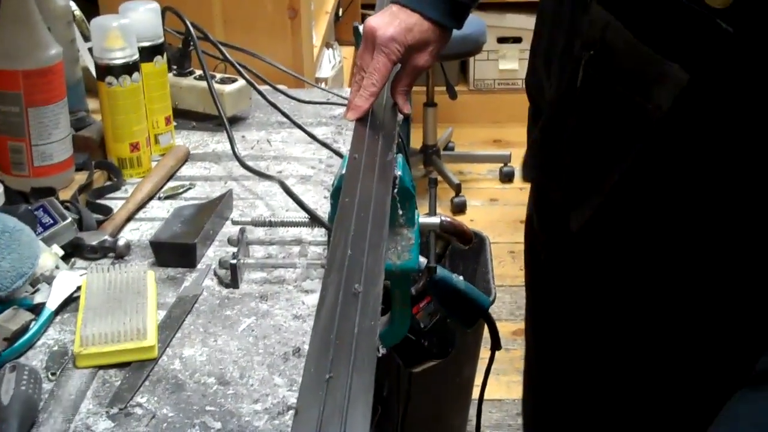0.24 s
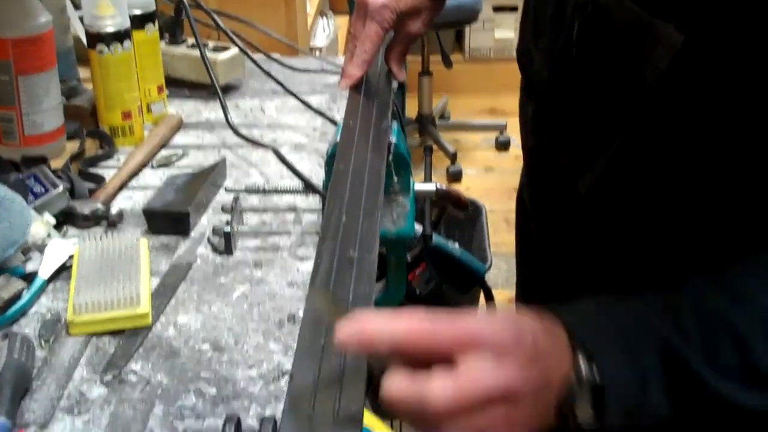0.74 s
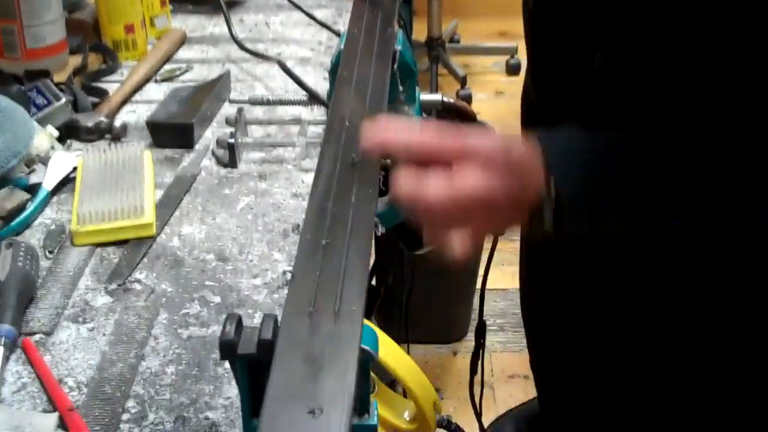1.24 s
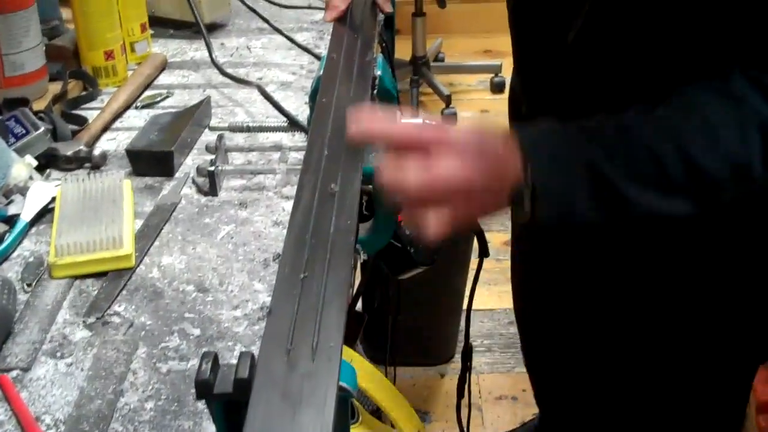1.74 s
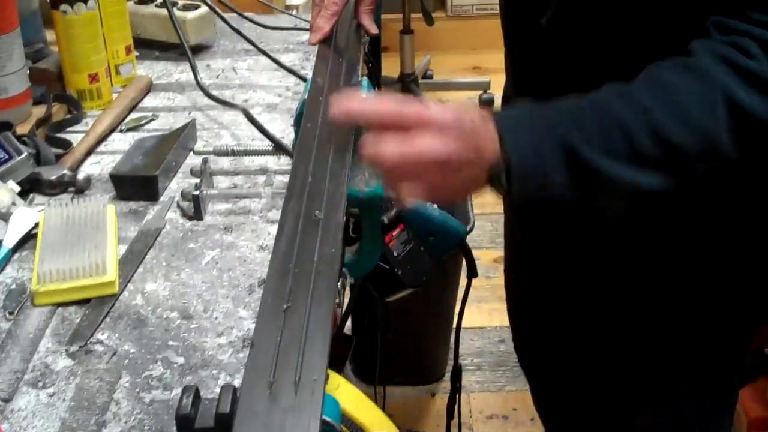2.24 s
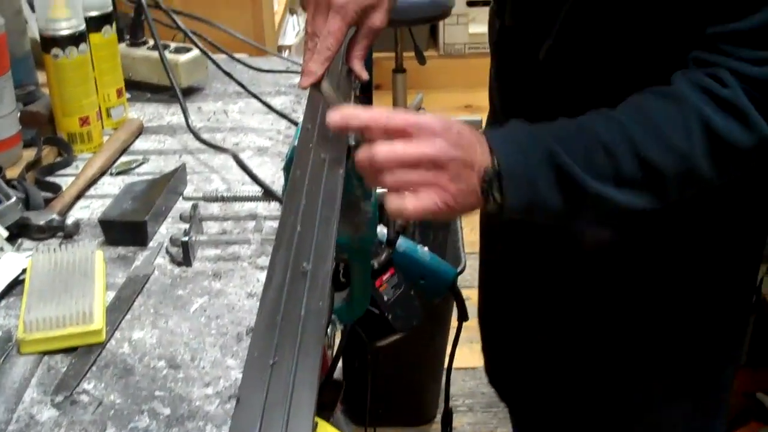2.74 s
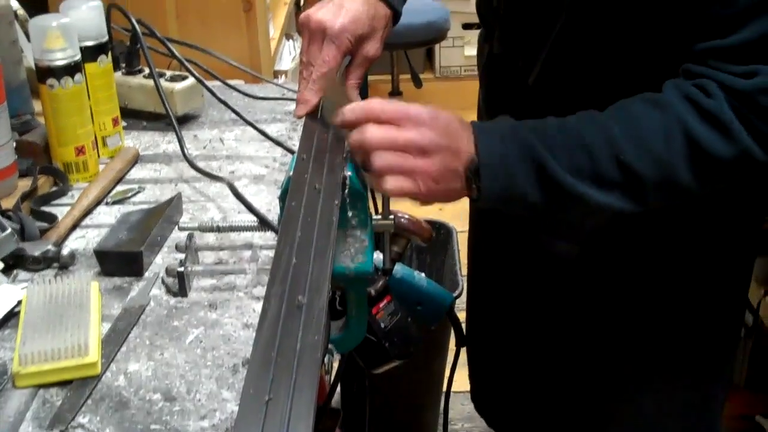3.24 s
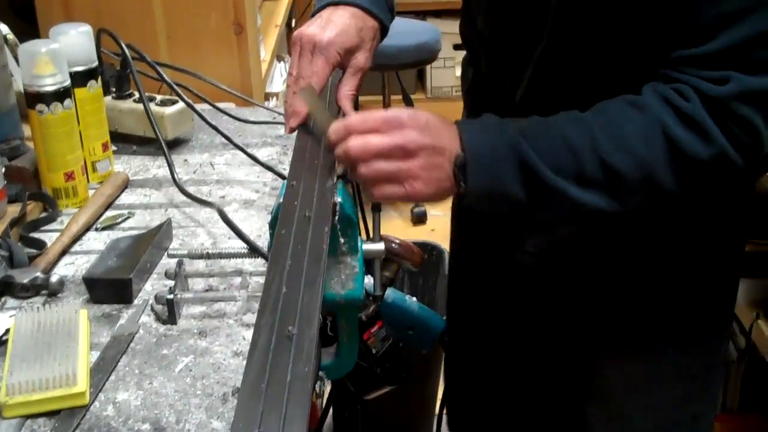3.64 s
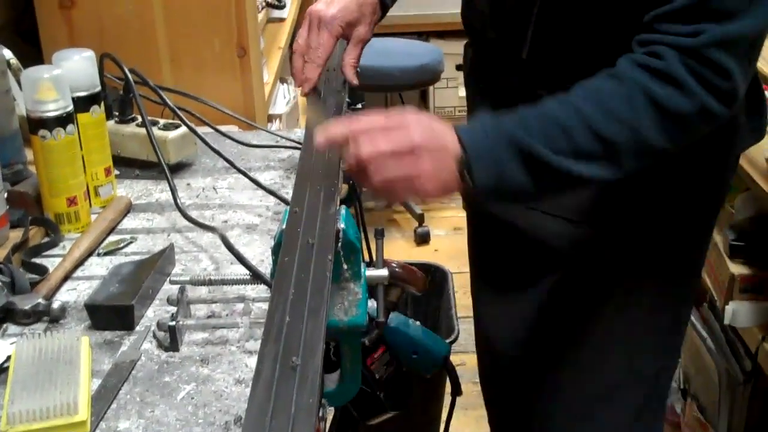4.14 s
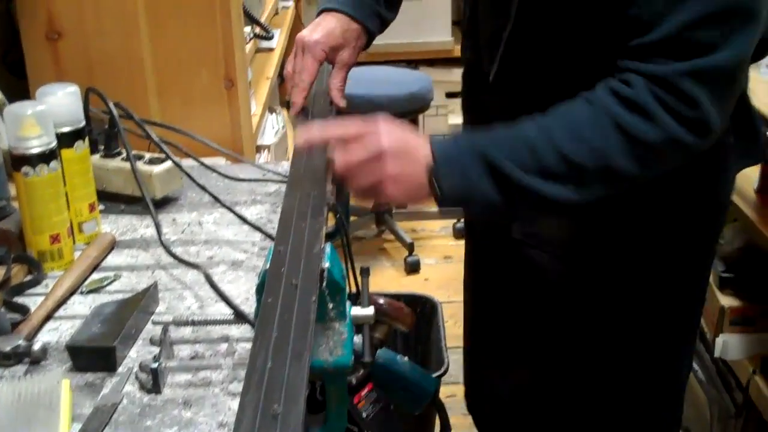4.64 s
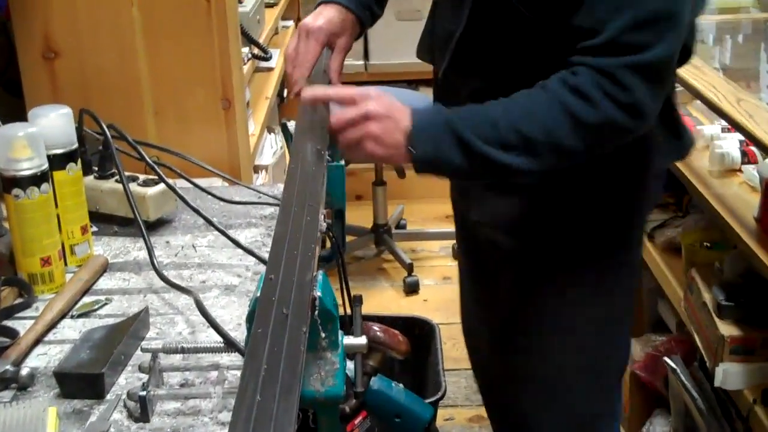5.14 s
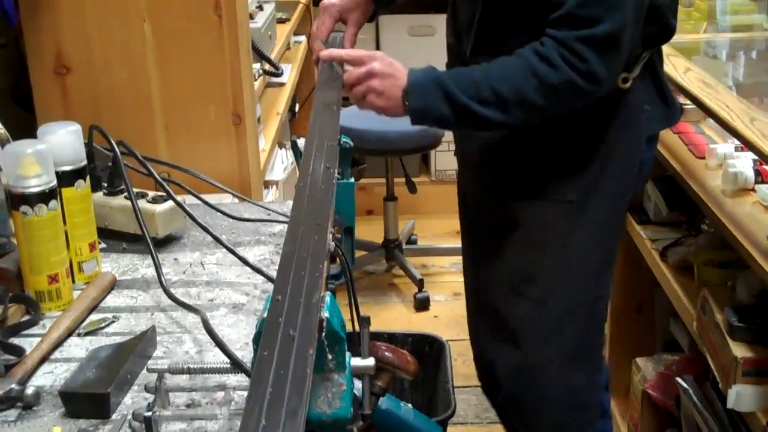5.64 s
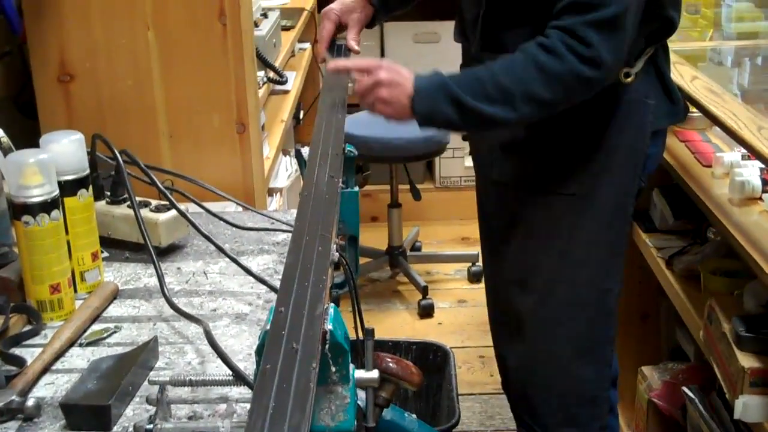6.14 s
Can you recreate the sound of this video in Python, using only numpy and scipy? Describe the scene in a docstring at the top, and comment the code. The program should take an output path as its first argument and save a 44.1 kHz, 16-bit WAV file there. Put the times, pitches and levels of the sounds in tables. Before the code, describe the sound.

A scraper works wax off the edge of a clamped ski in a small cluttered workshop, heard close in stereo. From 0 s, short scrapes quickly build into strong bright hissing strokes, each about a fifth of a second, swelling and stopping abruptly; the fullest comes near 0.6 s, with a thin squeak and flakes ticking at 0.7 s. After a weak touch at 0.8 s, broad sizzling strokes continue to 2.4 s, with snaps near 1.0 and 1.25 s. From 2.5 to 3.8 s the scrapes are shorter and choppier, raspier, with dull low bumps, a faint high squeal around 3.05 s and a hard knock at 3.34 s followed by small ticks. From 3.9 s to the end near 6.4 s, softer alternating strokes return, more hollow and ringing, with light knocks around 4.5, 5.0 and 5.6 s. Tiny wavering squeaks close it. Reflections are short; quiet room air lies beneath.

```python
"""Wax shears off in a grainy hiss, stroke after stroke, as a scraper goes to and fro along a ski's edge.
Breaking-wax noise makes the hiss, the blade's rasp and the ringing of the ski's body.
Sine modes thud dully as the ski bumps in its vice; noise bursts tick as flakes snap and knock as the
blade catches, and brief wavering tones squeak. A workshop reverberates around a camera's two ports."""
import sys
import numpy as np
from scipy import signal
from scipy.fft import rfft, irfft
from scipy.io import wavfile
from scipy.ndimage import uniform_filter1d, minimum_filter1d

SR = 44100
rng = np.random.default_rng(int(sys.argv[2]) if len(sys.argv) > 2 else 0)


def dump_mix(stems):
    """Bounce the given channels to the path in sys.argv[1] as a 16-bit WAV at rate SR."""
    frames = np.atleast_2d(stems).T  # one column per channel
    limited = np.clip(frames, -1, 1)  # hard clip at full scale
    pcm = np.round(limited * 32767).astype(np.int16)
    wavfile.write(sys.argv[1], SR, pcm)


N = 282240
TIME = np.arange(N) / SR
FREQS = np.fft.rfftfreq(N, 1 / SR)


def from_db(db):
    """Decibels to gain."""
    return 10 ** (np.asarray(db) / 20)


def evened(x):
    """Scales to rms 1."""
    return x / np.sqrt(np.mean(x ** 2) + 1e-20)


def read(points, hz):
    """Reads a table on a log-frequency axis."""
    f, value = np.transpose(points)
    return np.interp(np.log(hz + 1), np.log(f + 1), value)


def wobble(rate_hz):
    """Slow random drift of rms 1, made of noise below about the given rate."""
    spectrum = rfft(rng.standard_normal(N))
    return evened(irfft(spectrum / (1 + (FREQS / rate_hz) ** 4), N))


# air resonance of each microphone port: (frequency [Hz], level [dB])
LEFT_PORT_RESPONSE = [(100, -6), (3000, 1), (5300, 5.5), (6300, 7.5), (7000, 9.5), (7650, 13), (8300, 10),
                      (9200, 4), (10000, -1), (12000, -10.5), (14000, -3)]
RIGHT_PORT_RESPONSE = [(100, -7.5), (3000, -0.5), (5300, 3.5), (5900, 6.5), (6350, 12.5), (6750, 4),
                       (7200, 1), (8000, -4.5), (10000, -15), (12000, -29), (14000, -32)]
# how alike the two ports hear: (frequency [Hz], likeness [0-1])
PORT_LIKENESS = [(50, 0), (200, 0.2), (800, 0.95), (3000, 0.97), (4500, 0.73), (5500, 0.5), (6500, 0.16),
                 (7500, 0.14), (14000, 0.4)]


def at_ports(pair, spectrum, ring=1):
    """Colours two unrelated excitations into what the two resonant ports hear; their mean has rms 1."""
    shared, apart = rfft(pair)
    same = read(PORT_LIKENESS, FREQS)
    left = shared * from_db(read(LEFT_PORT_RESPONSE, FREQS))
    right = same * shared + np.sqrt(1 - same ** 2) * apart
    right = right * from_db(read(RIGHT_PORT_RESPONSE, FREQS))
    coloured = np.array([left, right]) * from_db(read(spectrum, FREQS)) * ring
    heard = irfft(coloured, N)
    return heard / np.std(heard.mean(0))


# spectrum of the room's still air: (frequency [Hz], level [dB])
AIR_SPECTRUM = [(20, 6.5), (50, -1), (100, -3.5), (300, -2), (1000, -5), (4000, -18), (14000, -41)]


def room_air():
    """The still air of the room: steady, low-weighted noise."""
    return from_db(-63.5) * at_ports(rng.standard_normal((2, N)), AIR_SPECTRUM)


RASP_SWELL, BODY_SWELL = 0.26, 0.017  # share of the hiss's swell that the rasp and the body follow
GRIND_S = 0.073  # the slowing blade digs in over about this long
DIG_DB, DIG_S = 3, 0.032  # the blade rasps harder as it first digs in
# as the blade lifts, hiss and rasp stop quickly while the ski rings down
LIFT_DB_PER_S, RING_DOWN_DB_PER_S = 708, 321


def stroke(start, length, bite_s, crest, swell_db, hiss_db, rasp_db, body_db, lean_db, grind_db):
    """Gains of hiss, rasp and body: the hiss follows the hand's speed; rasp and body shift as it slows."""
    age = TIME[(TIME >= start) & (TIME < start + length + .2)] - start
    crest = np.clip(crest, .05, .95)
    travel = np.interp(age, [0, crest * length, length], [0, .5, 1])
    speed = abs(np.sin(np.pi * travel))
    sag_db = swell_db * (speed - 1)
    lifted = np.maximum(age - length, 0)
    finish = np.exp(np.minimum(age - length, 0) / GRIND_S)
    dig_db = DIG_DB * np.exp(-age / DIG_S)
    levels = [hiss_db + sag_db - LIFT_DB_PER_S * lifted,
              rasp_db + dig_db + RASP_SWELL * sag_db + lean_db * finish - LIFT_DB_PER_S * lifted,
              body_db + BODY_SWELL * sag_db + grind_db * finish - RING_DOWN_DB_PER_S * lifted]
    return np.minimum(age / bite_s, 1) * from_db(levels)


RESTING_DB = (-51.5, -52.5, -57)  # the blade brushes the ski between strokes: (hiss, rasp, body)
# pushes and pulls of the scraper: (start [s], length [s], bite [s], place of top speed [0-1, kept to .05-.95],
# swell of the hiss [dB], wax hiss level [dB], blade rasp level [dB], ski body level [dB],
# change of the rasp at the finish [dB], change of the body at the finish [dB])
SCRAPER_STROKES = [(0.001, 0.053, 0.0013, 0.8, 15.0, -28, -37.5, -48, 0.0, 5),
                   (0.062, 0.16, 0.027, 0.92, 8.5, -22, -31, -43, 3.5, 4.5),
                   (0.255, 0.2, 0.033, 0.35, 9.0, -17.0, -27.5, -44.5, 1, 9.5),
                   (0.536, 0.24, 0.067, 0.82, 20.5, -12.5, -26, -41.5, -0.5, 1.5),
                   (0.791, 0.065, 0.028, 0.42, 8, -47.5, -40, -43, -1.5, 0),
                   (0.899, 0.15, 0.02, 0.98, 15.5, -17.5, -27.5, -45, 4, 4),
                   (1.095, 0.28, 0.029, 0.29, 1.5, -18.0, -26, -40, 3, 2),
                   (1.418, 0.22, 0.034, 0.64, 11.5, -17.5, -29.5, -46.5, 3, 7.5),
                   (1.663, 0.25, 0.031, 0.49, 14.5, -14.5, -26, -46, 1.5, 7),
                   (1.977, 0.18, 0.037, 0.52, 5, -21.5, -34.5, -43.5, 9, 3.5),
                   (2.192, 0.2, 0.035, 0.55, 8.5, -17, -23.5, -40.5, -5.5, -2.5),
                   (2.481, 0.039, 0.013, 0.38, 10, -36.5, -41.5, -56, -0.5, -2),
                   (2.518, 0.094, 0.027, 0.89, 7.0, -23.5, -37.5, -50, 6, 4),
                   (2.645, 0.15, 0.029, 0.44, 17, -19.5, -22.5, -44, -8, 3),
                   (2.849, 0.1, 0.024, 0.74, 12, -24, -33.0, -51, -2, 3),
                   (2.985, 0.1, 0.024, 0.65, 12, -18.5, -24.5, -42.5, -6, -1),
                   (3.162, 0.082, 0.012, 0.24, 4, -34.5, -39, -49, 1.5, 1.5),
                   (3.288, 0.07, 0.011, 0.86, 10, -23, -31.0, -45, -1.5, 2.5),
                   (3.449, 0.011, 0.01, 0.52, 4, -33, -36.5, -41, 3, -1),
                   (3.483, 0.043, 0.004, 0.3, 4, -30, -31, -43, -2.5, -3),
                   (3.561, 0.12, 0.018, 0.3, 5, -28.5, -27, -40, -5, -2),
                   (3.728, 0.11, 0.021, 0.89, 10.5, -27, -31.5, -49.5, -2, -0.5),
                   (3.864, 0.2, 0.022, 0.68, 7.5, -22, -27.5, -41.5, -6.5, 3.5),
                   (4.14, 0.17, 0.02, 0.62, 8, -26, -36.5, -55, -0.5, 12),
                   (4.348, 0.221, 0.023, 0.46, 12.5, -20, -32, -44.5, 5, 4.5),
                   (4.628, 0.21, 0.015, 0.85, 8, -31.5, -40, -49.5, 4, -0.5),
                   (4.868, 0.18, 0.024, 0.48, 17, -21.5, -27.5, -48.5, -14, 8.5),
                   (5.018, 0.11, 0.02, 0, 12, -24, -31, -42.5, 2, 1.5),
                   (5.204, 0.2, 0.046, 0.82, 22.5, -29.5, -39, -47.5, 7, 3.5),
                   (5.422, 0.28, 0.06, 0.42, 3.5, -21.5, -30.5, -40, 8.5, 0),
                   (5.755, 0.23, 0.052, 0.92, 12.0, -31, -36.0, -48.5, 1.5, 3.5),
                   (6.027, 0.19, 0.023, 0.92, 11, -25.5, -30.5, -41, 0.5, -6),
                   (6.222, 0.17, 0.025, 0, 13.5, -27.5, -28.5, -42, 5, -1.5)]


def effort():
    """All strokes add in power over the light touch of the resting blade: gains of hiss, rasp and body."""
    power = np.outer(from_db(RESTING_DB) ** 2, np.ones(N))
    for row in SCRAPER_STROKES:
        gains = stroke(*row)
        first = np.searchsorted(TIME, row[0])
        power[:, first:first + gains.shape[1]] += gains ** 2
    return np.sqrt(power)


def fractures(per_s, spread_db, smooth):
    """Tiny breaks in the wax, uneven in size, over smooth sliding friction."""
    size = from_db(spread_db * np.minimum(rng.exponential(1, N), 6))
    breaks = size * (rng.random(N) < per_s / SR)
    grains = evened(breaks * rng.choice([-1., 1.], (2, N)))
    return grains + smooth * rng.standard_normal((2, N))


def wandering(pair, spread_db, span_hz, hold_s):
    """As the blade travels it favours ever other modes: narrow bands swell and fade."""
    hz, t, z = signal.stft(pair, SR, nperseg=1024, noverlap=768)
    lag = np.fft.fftfreq(len(hz), hz[1])[:, None]
    rate = np.fft.fftfreq(len(t), t[1])
    smooth = np.exp(-(lag * span_hz) ** 2 - (rate * hold_s) ** 2)
    chance = np.fft.fft2(rng.standard_normal(smooth.shape))
    field = evened(np.fft.ifft2(chance * smooth).real)
    gain = from_db(spread_db * np.clip(field, -2, 2))
    return signal.istft(z * gain, SR, nperseg=1024, noverlap=768)[1][:, :N]


# what the ski rings with: (frequency [Hz], width [Hz], level over the broad response [dB])
SKI_MODES = [(182, 8.3, 10), (314, 11, 9.5), (459.5, 20, 10.5), (666, 94, 8), (831, 33, 4.5),
             (993, 23, 6.5), (1250, 30, 6), (1541, 24, 7), (1700, 18, 8), (1860, 130, 3), (2260, 76, -7.5),
             (2490, 39, 3.5), (2662, 41, 5.5), (2812, 27, 6.5), (3035, 22, 6.5), (3100, 51, 4.5),
             (3300, 29, 5), (3504, 42, 4.5), (4570, 170, -0.5)]


def ski_response():
    """Resonances on top of the ski's broad response; a negative level makes a dip."""
    return 1 + sum((from_db(db) - 1) / (1 + 2j * (FREQS - hz) / width) for hz, width, db in SKI_MODES)


# how far the work has moved out towards the ski's end: (time [s], share [0-1])
OUTWARD_TRAVEL = [(0, 0.18), (2.4, 0.36), (4.2, 0.86), (4.8, 0.98), (6.4, 1)]
# wax hiss at the ski's middle and near its end: (frequency [Hz], level [dB])
HISS_MIDDLE_SPECTRUM = [(500, -69), (2000, -40), (3800, -13), (5400, -5), (6350, 4), (7600, 2), (9500, -4),
                        (12000, 3), (14000, -5.5)]
HISS_END_SPECTRUM = [(500, -50), (2000, -33), (3800, -21.5), (5200, 1), (6350, 0), (7600, 1), (9500, 1.5),
                     (12000, 5.5), (14000, 0)]
# rasp of the blade: (frequency [Hz], level [dB])
RASP_SPECTRUM = [(300, -38), (1000, -31), (2150, -4.5), (2650, 2), (3300, 1.5), (3800, -0.5), (4500, 3.5),
                 (5500, -2.5), (8000, -3), (14000, -43)]
# the ski's body at its middle and near its end: (frequency [Hz], level [dB])
BODY_MIDDLE_SPECTRUM = [(60, -44), (250, -29), (420, -9.5), (560, -15), (760, 1.5), (1000, -4.5), (1300, 4),
                        (1800, 3), (2200, 4), (2800, -10), (3800, -11), (6000, -38)]
BODY_END_SPECTRUM = [(60, -32), (250, -14.5), (550, -13), (760, -3), (1030, 6), (1300, 4), (1750, -4),
                     (2200, 8), (2800, 0.5), (3800, -24), (6000, -39)]


def scraping():
    """Breaking wax hisses, the blade rasps and the ski's body sounds beneath them."""
    hiss_gain, rasp_gain, body_gain = effort()
    outward = np.interp(TIME, *np.transpose(OUTWARD_TRAVEL))
    grip = wobble(rate_hz=24)  # the blade grips and slides unevenly
    judder = wobble(rate_hz=100)
    ring = ski_response()
    wax = fractures(per_s=2500, spread_db=2.0, smooth=1.0)
    wax = wandering(wax, spread_db=4.5, span_hz=363, hold_s=0.064)
    blade = fractures(per_s=3000, spread_db=2.0, smooth=0.65)
    blade = wandering(blade, spread_db=4.0, span_hz=208, hold_s=0.037)
    ski = fractures(per_s=1500, spread_db=0.5, smooth=0.82)
    ski = wandering(ski, spread_db=4.5, span_hz=121, hold_s=0.086)

    shear = (1 - outward) * at_ports(wax, HISS_MIDDLE_SPECTRUM) + outward * at_ports(wax, HISS_END_SPECTRUM)
    hiss = shear * hiss_gain * from_db(1.22 * grip + 0.13 * judder)
    rasp = at_ports(blade, RASP_SPECTRUM, ring) * rasp_gain * from_db(0.68 * grip + 0.37 * judder)
    # the free end rings more sharply than the clamped middle
    middle = at_ports(ski, BODY_MIDDLE_SPECTRUM, ring)
    end = at_ports(ski, BODY_END_SPECTRUM, ring * abs(ring) ** 0.38)
    body = (1 - outward) * middle + outward * end
    return hiss + rasp + body * body_gain * from_db(0.26 * wobble(rate_hz=78))


# workshop reverberation: (frequency [Hz], t60 [s])
ROOM_DECAY = [(150, 0.88), (800, 0.22), (2500, 0.2), (6000, 0.13), (14000, 0.13)]


def workshop(x):
    """A short, cluttered room: sparse reflections, the treble dying first."""
    taps = rng.choice([-1., 1.], (2, SR // 2)) * (rng.random((2, SR // 2)) < 2500 / SR)
    taps[:, :SR // 200] = 0  # no reflection in the first 5 ms
    hz, t, z = signal.stft(taps, SR, nperseg=256)
    same = 1 / (1 + (hz[:, None] / 450) ** 2)  # long waves reach both ports alike
    z[1] = same * z[0] + np.sqrt(1 - same ** 2) * z[1]
    decay = from_db(-60 * t / read(ROOM_DECAY, hz)[:, None])
    tail = signal.istft(z * decay, SR, nperseg=256)[1]
    return signal.fftconvolve(x, tail / np.linalg.norm(tail[0]), axes=1)[:, :N]


# the pushes bump the ski in the vice: (time [s], level before a common 9 dB cut [dB])
VICE_BUMPS = [(0.018, -44), (0.078, -45.5), (0.392, -53), (0.439, -48), (0.558, -46), (0.783, -49),
              (1.275, -45), (1.836, -43), (2.037, -49), (2.778, -45), (3.071, -37), (3.173, -44.5),
              (3.35, -38.5), (3.567, -38.5), (3.66, -39.5), (3.961, -38), (4.05, -42.5), (4.171, -48),
              (4.287, -45), (4.346, -45), (4.49, -43), (4.691, -45.5), (5.119, -42.5), (5.531, -42.5),
              (5.59, -44.5), (6.048, -42), (6.12, -45), (6.268, -53)]
# the clamped ski's bending modes: (frequency [Hz], level [dB], t60 [s])
BENDING_MODES = [(107, -9, 0.13), (147.5, -4.5, 0.079), (187.3, -3, 0.12), (240.4, -5, 0.16),
                 (312, -1.5, 0.067), (390, -5.5, 0.16), (471, -2.5, 0.076), (572, -3.5, 0.18)]


def bumps():
    """Each bump rings the bending modes, a little differently as the hand damps and loads the ski."""
    out, age = np.zeros(N), np.arange(SR // 3) / SR
    chance = rng.standard_normal((len(VICE_BUMPS), len(BENDING_MODES), 3))
    rise = 1 - np.exp(-age / 0.0014)
    for (s, db), draws in zip(VICE_BUMPS, chance):
        thud = np.zeros(len(age))
        for (hz, mode_db, t60), (size, load, turn) in zip(BENDING_MODES, draws):
            loudness = from_db(mode_db + 2.5 * size - 60 * age / t60)
            thud += loudness * np.sin(2 * np.pi * (hz * (1 + 0.043 * load) * age + turn))
        part = out[round(s * SR):][:len(age)]
        part += (from_db(db - 9) * thud * rise)[:len(part)]
    return out * from_db([[1], [-1]])  # slightly to the left


def blow(s, db, t60, rise_s):
    """Envelope of one blow: a quick rise, then a steady dying away."""
    age = np.maximum(TIME - s, 0)
    fall_db = np.minimum(60 * age / max(t60, .005), 200)
    return (1 - np.exp(-age / rise_s)) * from_db(db - fall_db)


# flakes of wax snap off: (time [s], level before a common 4.5 dB cut [dB], t60 [s])
WAX_SNAPS = [(0.1679, -5, 0.027), (0.7155, -4, 0.023), (0.7298, -5, 0.04), (1.011, -5.5, 0.068),
             (1.23, -1, 0.07), (1.329, -10, 0.066), (2.1344, -25, 0.03), (3.331, -16, 0.03),
             (3.3624, -11.5, 0.021), (3.4526, -28, 0.055), (3.484, -11.5, 0.024), (3.4955, -15, 0.05),
             (6.1376, -17, 0.032)]


def snaps():
    """A snapping flake only ticks: a short burst of noise with the colour of the wax."""
    ticks = sum(blow(s, db, t60, rise_s=0.00031) for s, db, t60 in WAX_SNAPS)
    return from_db(-4.5) * ticks * at_ports(rng.standard_normal((2, N)), HISS_MIDDLE_SPECTRUM)


# the blade sticks and slips: (middle [s], length [s], frequency [Hz], level [dB])
BLADE_SQUEAKS = [(0.677, .03, 7750, -13), (2.915, .06, 7600, -25), (3.048, .11, 7750, -19),
                 (6.252, .014, 2720, -26), (6.254, .02, 3530, -27), (6.307, .028, 3530, -26),
                 (6.318, .018, 2780, -27), (6.364, .03, 3600, -29), (6.383, .024, 2390, -30),
                 (6.393, .016, 4220, -29)]


def squeaks():
    """The blade's stick and slip as short unsteady sine tones, each heard through the two ports."""
    out, waver = np.zeros((2, N)), wobble(rate_hz=110)
    for s, length, hz, db in BLADE_SQUEAKS:
        near = abs(TIME - s) < length / 2
        swell = np.cos(np.pi * (TIME[near] - s) / length)
        pitch = hz * (1 + 0.023 * waver[near])
        tone = np.sin(2 * np.pi * np.cumsum(pitch) / SR)
        ports = from_db([read(LEFT_PORT_RESPONSE, hz), read(RIGHT_PORT_RESPONSE, hz)])
        out[:, near] += np.outer(ports / ports.mean(), from_db(db) * swell * tone)
    return out


HEFT_HZ = 710  # a heavy catch moves the whole ski, below this pitch
CRACK_DB, CRACK_T60_S = -7.5, .025  # crack of the blade's own edge, its level relative to the catch's
# the blade catches on the edge and knocks the ski: (time [s], level before the knock's 8.5 dB cut [dB],
# ring t60 [s], weight of the low part [dB])
BLADE_CATCHES = [(0.779, -21.5, 0.054, -1), (2.375, -20.5, 0.13, 2), (3.079, -25, 0.26, 4),
                 (3.34, -9.5, 0.12, -3.5), (4.295, -29.5, 0.1, 13), (4.501, -17, 0.11, -3),
                 (4.548, -20.5, 0.11, 2), (5.038, -22, 0.38, -8), (5.575, -23.5, 0.24, 2),
                 (5.639, -20, 0.1, -11), (6.249, -17.5, 0.041, -24)]
# knock of a catching blade: (frequency [Hz], level [dB])
KNOCK_SPECTRUM = [(100, -17), (450, -6.5), (900, -1), (1800, 4.5), (3600, 1.5), (5000, -9), (8000, -7),
                  (14000, -17)]


def catches():
    """A catch cracks and sets the ski's dense modes ringing, a heavy one its low ones too."""
    knock_noise, crack_noise = rng.standard_normal((2, 2, N))
    knock = at_ports(knock_noise, KNOCK_SPECTRUM, ski_response()) * from_db(-8.5)
    low = irfft(rfft(knock) / (1 + (FREQS / HEFT_HZ) ** 6), N)
    high = knock - low
    crack = at_ports(crack_noise, RASP_SPECTRUM)
    out = np.zeros((2, N))
    for s, db, t60, low_db in BLADE_CATCHES:
        out += blow(s, db, t60, rise_s=0.0001) * (high + from_db(low_db) * low)
        out += blow(s, db + CRACK_DB, CRACK_T60_S, rise_s=.0002) * crack
    return out


def scene():
    """The work on the ski, its reflections and the still air of the room."""
    air = room_air()
    work = scraping() + snaps() + squeaks() + catches()
    thuds = bumps()
    reflections = workshop(from_db(-11) * work + from_db(-5.5) * thuds)
    return work + thuds + reflections + air


def record(dry):
    """The camera limits the band before and after a fast limiter that holds down the highest peaks."""
    lowpass = signal.firwin(601, 14300, window=("kaiser", 8), fs=SR)[None]  # cutoff in Hz
    band = signal.oaconvolve(dry, lowpass, "same", axes=1)
    allowed = .97 / np.maximum(abs(band).max(0), .97)
    gain = uniform_filter1d(minimum_filter1d(allowed, size=301), size=201)
    return signal.oaconvolve(band * gain, lowpass, "same", axes=1)


dry = scene()
out = record(dry)
dump_mix(out)
```